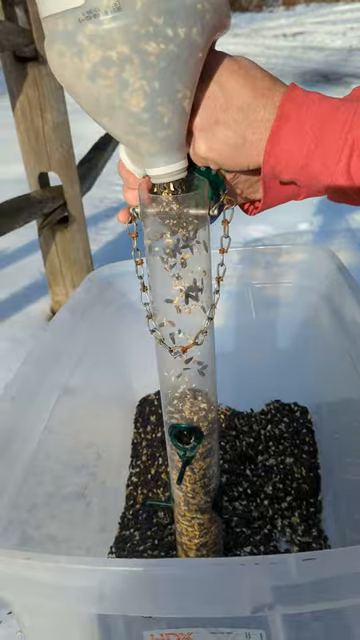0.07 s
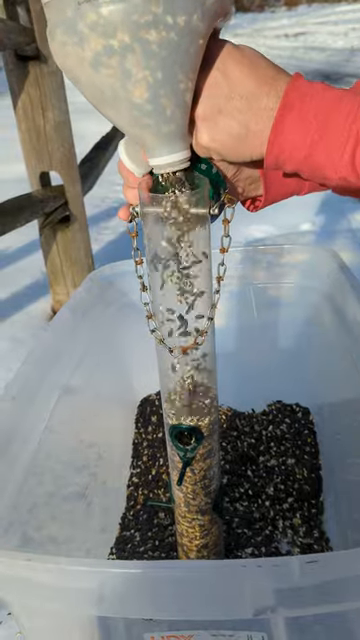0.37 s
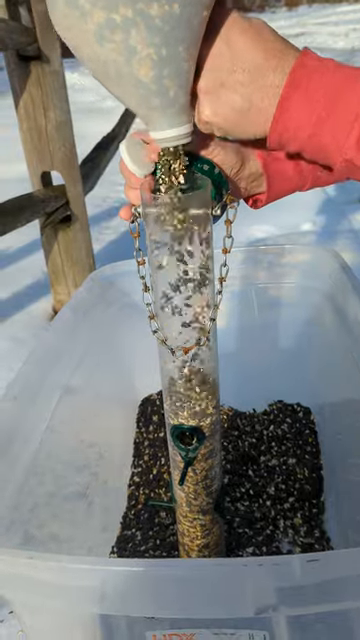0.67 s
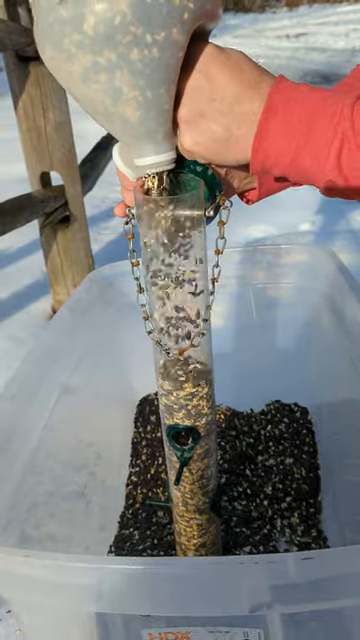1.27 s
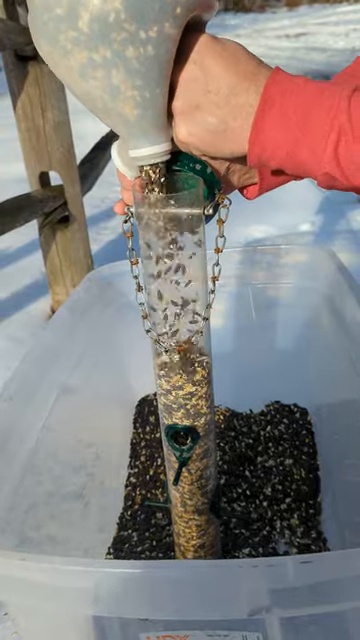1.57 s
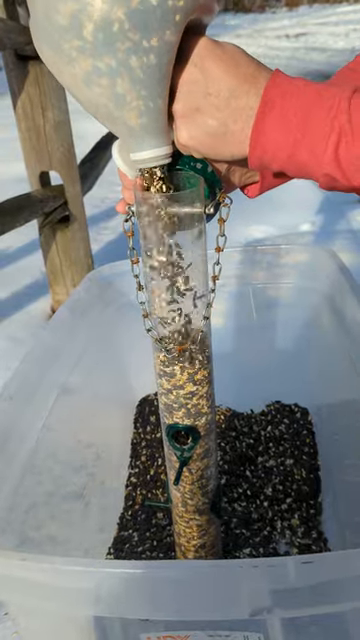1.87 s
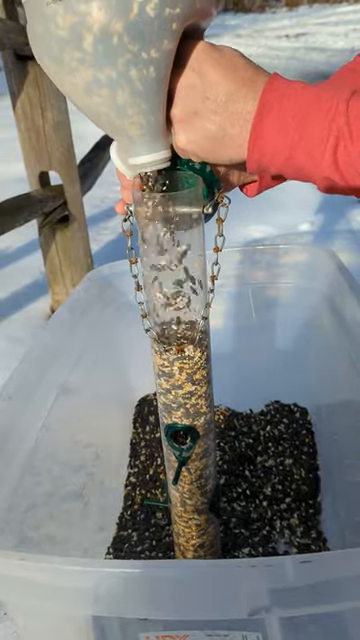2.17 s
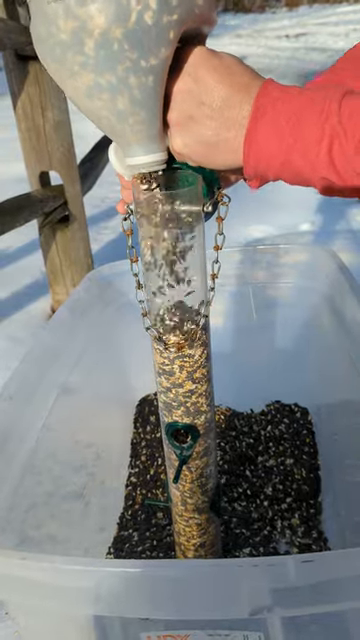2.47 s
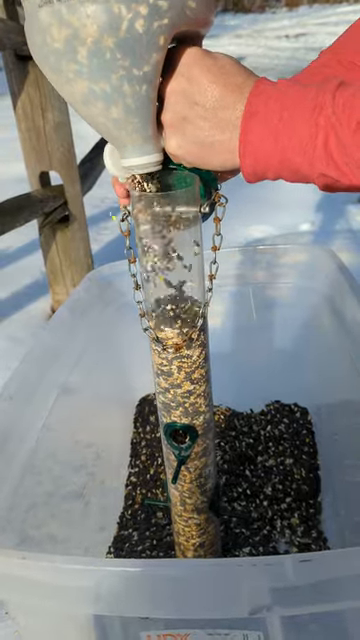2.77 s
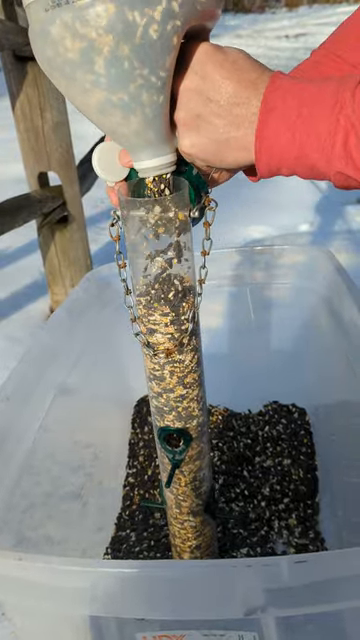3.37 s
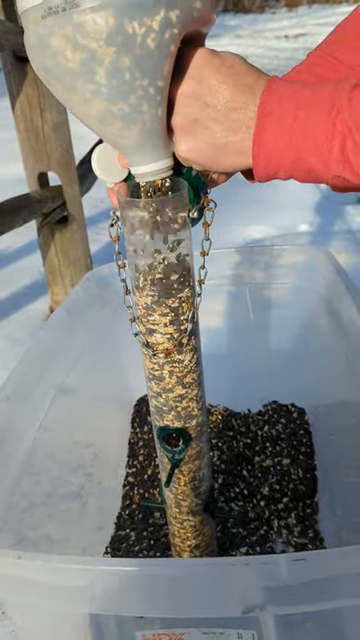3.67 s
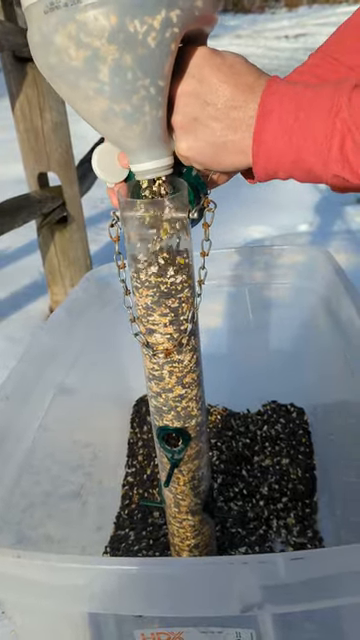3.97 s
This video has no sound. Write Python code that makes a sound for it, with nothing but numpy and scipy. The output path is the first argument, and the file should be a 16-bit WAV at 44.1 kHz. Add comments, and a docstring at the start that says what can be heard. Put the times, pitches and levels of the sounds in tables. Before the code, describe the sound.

Dry seed pours into a plastic tube feeder for the whole 4 seconds, a close, dense, bright patter slightly to the left. Large seeds click and ping on the plastic, hardest in the first 2 seconds. The tube's hollow ring rises slightly and fades from about 1 second on. The jug gives a few very soft knocks, near 0.3 and 2.7 seconds, over a barely audible outdoor rumble.

```python
"""Filling a bird feeder.

Dry seed pours from a plastic jug into a plastic tube feeder outdoors. Thousands of seeds a second
tick on the pile and the tube wall in small clumps; large ones strike hard and ping. The air in the
tube rings, rises in pitch and fades as the tube fills. The jug knocks and hums softly in the hand,
over a faint distant rumble."""
import sys
import numpy as np
from scipy import signal
from scipy.fft import rfft, irfft, next_fast_len
from scipy.io import wavfile
from scipy.ndimage import map_coordinates

SR = 44100
rng = np.random.default_rng(int(sys.argv[2]) if len(sys.argv) > 2 else 0)


def digitize_waveform(pressure):
    """Quantize a signal to 16-bit integers and store it at the path in sys.argv[1].

    Rows of a 2-D input are taken as channels; values are limited to [-1, 1].
    """
    field = np.atleast_2d(pressure).T
    bounded = np.clip(field, -1, 1)
    quanta = np.round(bounded * 32767).astype(np.int16)
    wavfile.write(sys.argv[1], SR, quanta)


N = 176400

# Lowest air mode as the tube fills. Each row: time in seconds, pitch in Hz, relative level in dB,
# relative level of the mode at three times that pitch in dB.
FUNDAMENTAL = [(0, 346.8, -67, -86), (0.8, 364.8, -65, -72), (1.5, 377.6, -65.5, -60.5),
               (2.2, 393.5, -67.5, -59), (2.8, 403.4, -68, -62.5), (4, 417, -67, -69)]


def amp(db):
    """Decibels to gain."""
    return 10 ** (np.asarray(db) / 20)


def unit(x):
    """Scale to rms 1."""
    return x / np.sqrt(np.mean(x ** 2) + 1e-20)


def along(points, hz):
    """Interpolate (Hz, value) rows on a log axis."""
    f, v = np.transpose(points)
    return np.interp(np.log(hz + 1), np.log(f + 1), v)


def curve(rows):
    """One value per sample from (seconds, value) rows."""
    return np.interp(np.arange(N) / SR, *np.transpose(rows))


def wobble(rate_hz):
    """Smooth random curve, rate_hz knots a second."""
    knots = rng.standard_normal(int(N * rate_hz / SR) + 4)
    return map_coordinates(knots, [np.arange(N) * rate_hz / SR])


def filtered(x, response):
    """Multiply the spectrum of x by response(hz)."""
    m = next_fast_len(N + SR // 4)
    return irfft(rfft(x, m) * response(np.fft.rfftfreq(m, 1 / SR)), m)[..., :N]


def low_cut(x, cut_hz):
    """Zero-phase high-pass, 24 dB per octave."""
    return filtered(x, lambda hz: hz ** 4 / (hz ** 4 + cut_hz ** 4))


def body(x, gain, size=4096):
    """Ring x through a minimum-phase filter of magnitude gain(hz)."""
    cepstrum = irfft(np.log(np.maximum(gain(np.fft.rfftfreq(size, 1 / SR)), 1e-6)))
    cepstrum[1:size // 2] *= 2
    cepstrum[size // 2 + 1:] = 0
    impulse = irfft(np.exp(rfft(cepstrum)))
    return signal.fftconvolve(x, impulse[None], axes=1)[:, :N]


def ticks(stream_db, seeds, rate_hz, spread_db, t60_s, rattle_db, rattle_t60_s):
    """Impacts of random size: a tiny crack, then a brief rattle of the nudged seeds."""
    chance, shared_size = seeds
    share = 0.84  # how far a seed sounds equally strong on all it touches
    size = share * shared_size + np.sqrt(1 - share ** 2) * rng.standard_normal(N)
    energy = (chance < rate_hz / SR) * amp(stream_db + spread_db * np.minimum(size, np.e)) ** 2
    t = np.arange(SR // 20) / SR
    crack, rattle = amp(-60 * t / t60_s) ** 2, amp(-60 * t / rattle_t60_s) ** 2
    decay = crack / crack.sum() + amp(rattle_db) ** 2 * rattle / rattle.sum()
    power = signal.fftconvolve(energy, decay)[:N]
    return unit(np.sqrt(abs(power)) * rng.standard_normal((2, N)))


def pings(rate_hz, low_hz, high_hz, spread_db, t60_s, samples):
    """Seeds differ in size, so each rings briefly at its own pitch."""
    draws, step = rng.random((int(rate_hz * N / SR), 5)), np.arange(samples)
    onset, pitch, size, *phases = draws.T[:, :, None]
    size_db = spread_db * np.clip(np.log(size / (1 - size)) / np.sqrt(np.pi), -np.e, np.e)
    hz = low_hz + (high_hz - low_hz) * pitch
    fade = amp(size_db) * amp(-60 * step / SR / t60_s)
    where = ((onset * N).astype(int) + step).ravel()
    rings = [fade * np.sin(2 * np.pi * (hz * step / SR + phase)) for phase in phases]
    return unit(np.array([np.bincount(where, ring.ravel(), N)[:N] for ring in rings]))


def pile(stream_db, seeds):
    """Seeds land on the pile, coloured by the feeder under it."""
    # Each row: time in seconds, relative level in dB.
    flow = [(0.0, -42), (0.01, -42.5), (0.18, -46), (0.19, -55), (0.21, -40), (0.32, -46.5), (0.335, -39.5),
            (0.36, -42.5), (0.39, -42.5), (0.41, -60), (0.43, -40), (0.8, -43), (0.83, -40.5),
            (0.92, -42.5), (1.0, -41), (1.06, -45), (1.11, -39.5), (1.15, -44), (1.98, -42.5),
            (2.02, -44.5), (3.04, -45), (3.09, -42.5), (3.28, -44), (3.38, -46), (3.68, -44), (3.88, -46),
            (4.0, -43.5)]
    # Contact spectrum. Each row: frequency in Hz, relative gain in dB.
    colour = [(40, -54), (130, -38.5), (280, -23.5), (400, -18), (520, -11.5), (680, -10.5), (850, -8.5),
              (1030, -16.5), (1250, -5.5), (1600, -1.5), (2400, 2), (3600, -5), (5000, -11), (8000, -4.5),
              (15000, -13)]
    # Feeder resonances. Each row: centre in Hz, width in Hz, lift in dB.
    resonances = [(640, 260, 1), (870, 270, 0.5), (1769, 98, 6.5), (1800, 87, 0.5), (2430, 290, -1),
                  (2590, 230, -3), (2820, 280, 2.5)]

    def gain(hz):
        lift_db = sum(db / (1 + (2 * (hz - centre) / width) ** 2) for centre, width, db in resonances)
        return amp(along(colour, hz) + lift_db)
    hits = ticks(stream_db, seeds, rate_hz=3200, spread_db=2.5, t60_s=0.00087,
                 rattle_db=2.5, rattle_t60_s=0.057)
    return unit(body(hits, gain)) * amp(curve(flow) + 2)


def husks(stream_db, seeds):
    """Light husks and millet tick, with bright pings of single seeds."""
    # Each row: time in seconds, relative level in dB.
    flow = [(0.0, -35), (0.15, -38.5), (0.46, -40.5), (0.48, -51), (0.5, -37), (0.57, -40.5), (0.6, -34.5),
            (0.61, -39.5), (0.75, -37), (1.2, -42.5), (1.37, -39), (1.49, -41), (1.54, -37), (1.55, -44),
            (1.73, -41), (1.74, -40), (1.79, -44), (1.84, -38.5), (1.85, -40.5), (2.26, -42), (2.28, -38),
            (2.31, -44.5), (2.39, -41), (2.47, -42.5), (3.06, -42), (3.09, -38.5), (3.22, -43), (3.74, -43),
            (3.79, -47), (4.0, -42)]
    # Contact spectrum. Each row: frequency in Hz, relative gain in dB.
    colour = [(1000, -16.5), (4000, -2.5), (7000, -6), (8700, -2), (9500, -3.5), (10300, 0.5), (10900, -3),
              (11600, 1), (12400, 0), (13300, -2.5), (15000, -1.5), (16000, -3.5)]
    hits = ticks(stream_db, seeds, rate_hz=3000, spread_db=3, t60_s=0.00068,
                 rattle_db=1, rattle_t60_s=0.047)
    rings = pings(rate_hz=1600, low_hz=3470, high_hz=16130, spread_db=2.5, t60_s=0.02, samples=680)
    hits += amp(-3) * unit(amp(stream_db) * rings)
    return unit(body(hits, lambda hz: amp(along(colour, hz)))) * amp(curve(flow) + 4.5)


def wall(stream_db, seeds):
    """Seeds glance off the tube wall."""
    # Each row: time in seconds, relative level in dB.
    flow = [(0.0, -48), (0.14, -37.5), (0.19, -53), (0.23, -39), (0.31, -49), (0.33, -44), (0.36, -43),
            (0.43, -42), (0.5, -45.5), (0.83, -38.5), (0.92, -46), (0.97, -36), (1.16, -43), (2.17, -42.5),
            (2.33, -45.5), (3.05, -43), (3.16, -40), (3.3, -40), (3.46, -43), (3.71, -39), (3.73, -44),
            (3.97, -41.5), (4.0, -43)]
    # Contact spectrum. Each row: frequency in Hz, relative gain in dB.
    colour = [(2000, -42), (5400, -16.5), (6100, -6), (6700, -3.5), (7250, -0.5), (7650, -5.5),
              (8000, -13.5), (8800, -6.5), (11000, -53)]
    hits = ticks(stream_db, seeds, rate_hz=2600, spread_db=5.5, t60_s=0.0019,
                 rattle_db=-1.5, rattle_t60_s=0.032)
    return unit(body(hits, lambda hz: amp(along(colour, hz)))) * amp(curve(flow) + 1.5)


def tube_air(stream_db, seeds, hard_hits):
    """Patter and hard strikes ring the tube's air modes, which glide up as the seed rises."""
    # Ring of the patter, choked by the fill. Each row: time in seconds, relative level in dB.
    hollow = [(0, -34), (.1, -36.5), (.18, -41.5), (.24, -38), (.4, -39.5), (.47, -39.5), (.65, -40.5),
              (.87, -39.8), (1.08, -43.5), (1.25, -47), (2.15, -47.5), (2.8, -53), (4, -60)]
    # Each row: starting pitch in Hz, width in Hz, relative gain in dB, share of the fundamental's rise.
    modes = [(844, 94, -7, .6), (1469, 90, 4, 0.66), (1745, 63, -5, 0.1), (2250, 190, -0.5, 0.43),
             (2873, 140, 3, 0.71), (3247, 120, -5.5, 0.48), (4130, 87, 1.5, 0.38), (4326, 180, -0.5, 0.55),
             (6150, 280, 2, 0.33), (7480, 90, -1, .05)]
    patter = ticks(stream_db, seeds, rate_hz=3000, spread_db=3.5, t60_s=0.0013,
                   rattle_db=-2, rattle_t60_s=0.02)
    drive = patter * amp(curve(hollow)) + amp(-8.5) * hard_hits
    pitch_hz = curve(np.array(FUNDAMENTAL)[:, :2])
    out, noise_power = 0, 0
    for hz, width_hz, db, follow in modes:
        carrier = np.exp(2j * np.pi * np.cumsum(hz * (pitch_hz / pitch_hz[0]) ** follow) / SR)
        pole = np.exp(-np.pi * width_hz / SR)
        envelope = signal.lfilter([1 - pole], [1, -pole], drive * carrier.conj())
        out += amp(db) * (carrier * envelope).real
        noise_power += amp(db) ** 2 * (1 - pole) / (1 + pole) / 2
    return low_cut(out / np.sqrt(noise_power), cut_hz=740)  # trims the resonators' low skirts


def low_ring(width_hz=63, flutter_db=1.9):
    """Patter keeps the tube's two lowest odd air modes sounding; their pitch creeps up with the fill."""
    rows = np.array(FUNDAMENTAL)
    cycles = np.cumsum(curve(rows[:, :2])) / SR
    out = 0
    for multiple, column in [(1, 2), (3, 3)]:
        patter = rng.standard_normal((2, N)) + 1j * rng.standard_normal((2, N))
        band = signal.butter(2, multiple * width_hz / 2, fs=SR, output="sos")
        ring = (signal.sosfilt(band, patter) * np.exp(2j * np.pi * multiple * cycles)).real
        flutter = amp(flutter_db * wobble(rate_hz=30))
        out += unit(flutter * ring) * amp(curve(rows[:, [0, column]]))
    return out


def outdoors(level_db=-72.5, side_db=-10):
    """Faint distant rumble, nearly the same on both sides."""
    # Rumble spectrum before the roll-off. Each row: frequency in Hz, relative gain in dB.
    colour = [(20, -20), (38, -12), (58, 1), (85, -1.5), (105, -6), (120, 5), (140, -4), (250, -10.5),
              (1000, -25)]
    noise = rng.standard_normal((2, N))
    mid, side = filtered(noise, lambda hz: amp(along(colour, hz)) / (1 + (hz / 1500) ** 2))
    return amp(level_db) * unit(mid + amp(side_db) * np.array([side, -side]))


def strikes(attack_s=0.00101, spray_octaves=1.5):
    """Large seeds hit the plastic: a short ping with a 1 ms attack, in a spray of smaller contacts."""
    # Each row: start in seconds, relative level in dB, pitch in Hz.
    hits = [(0.0295, -24.5, 6350), (0.098, -24, 4430), (0.2481, -18, 6280), (0.3299, -17.5, 6030),
            (0.338, -21, 6030), (0.438, -14.5, 7460), (0.4471, -18, 6800), (0.4682, -17.5, 7560),
            (0.4893, -21, 2950), (0.597, -22.5, 7050), (0.6075, -16.5, 7480), (0.709, -25, 7240),
            (0.845, -19, 6100), (0.996, -19, 7300), (1.082, -17.5, 6120), (1.149, -23, 6730),
            (1.183, -26, 6280), (1.313, -17, 10360), (1.4192, -21, 7600), (1.512, -21, 11900),
            (1.5281, -15, 11300), (1.6184, -23, 8530), (1.8286, -18, 10600), (1.8294, -23.5, 4320),
            (1.8682, -22, 6800), (1.9665, -22, 7340), (2.174, -21.5, 8990), (2.2295, -30, 7300),
            (2.3509, -25, 2290), (2.6863, -23, 9340), (2.7674, -19, 10100), (2.9298, -26, 7700),
            (3.079, -23, 6500), (3.2785, -23, 7300), (3.3454, -28, 6900), (3.4665, -29, 6960),
            (3.508, -24, 7200), (3.7456, -26, 8800), (3.7733, -25.5, 6580), (3.8912, -22, 6770)]
    out, t = np.zeros((2, N + SR)), np.arange(SR // 20) / SR
    octave = np.log2(np.fft.rfftfreq(len(t), 1 / SR) + 1)

    def envelope(t60_s):
        return np.minimum(t / attack_s, 1) ** np.pi * amp(-60 * np.maximum(t - attack_s, 0) / t60_s)
    ring = amp(1) * envelope(t60_s=0.0093)
    crack = amp(1.5) * envelope(t60_s=0.0007)
    rattle = envelope(t60_s=0.018)
    for start_s, db, hz in hits:
        ping = ring * np.sin(2 * np.pi * (hz * t + rng.random((2, 1))))
        colour = 1 / (1 + ((octave - np.log2(hz)) / spray_octaves) ** 2)
        spray = unit(irfft(rfft(rng.standard_normal((2, len(t)))) * colour, len(t)))
        out[:, round(start_s * SR):][:, :len(t)] += amp(db - 13) * (ping + spray * (crack + rattle))
    return low_cut(out[:, :N], cut_hz=1100)


def jug(rise_cycles=0.89):
    """The jug knocks softly against the feeder and hums as it flexes in the hand."""
    # Each row: start in seconds, level in dB, pitch in Hz, T60 in seconds.
    knocks = [(.305, -55, 150, .09), (.331, -54, 185, .08), (1.345, -62, 85, .14), (1.445, -56, 50, 0.19),
              (2.658, -47, 897, .08), (2.79, -63, 65, .14), (2.975, -58, 159, .11)]
    # Each row: centre in seconds, level in dB, pitch in Hz, half length in seconds.
    flexes = [(1.70, -68, 85, .06), (1.803, -57, 83, 0.071), (1.80, -71.5, 162, 0.061)]
    t, out = np.arange(N) / SR, 0
    for start_s, db, hz, t60_s in knocks:
        age = np.maximum(t - start_s, 0)
        swell = 1 - np.exp(-(age * hz / rise_cycles) ** 2)  # soft contact: lower swells slower
        out += amp(db - 60 * age / t60_s) * swell * np.sin(2 * np.pi * hz * age)
    for centre_s, db, hz, half_s in flexes:
        age = t - centre_s
        out += amp(db) * np.exp(-(age / half_s) ** 2) * np.sin(2 * np.pi * hz * age)
    return out


def placed(pair):
    """Mix two unrelated versions of a sound into left and right at the feeder's position."""
    # Each row: frequency in Hz, left-right coherence from 0 to 1.
    coherence = [(200, 0.97), (900, 0.95), (1700, 0.95), (2600, 0.42), (4300, 0.89), (6500, 0.78),
                 (7800, 0.06), (10000, 0.38), (12200, 0.26), (15000, 0.17)]
    # Each row: frequency in Hz, left over right in dB.
    balance = [(100, .5), (400, 2.3), (800, 1.6), (1600, 3.4), (3000, 5.6), (4400, 7.7), (6000, 5.9),
               (7400, 10.6), (9000, 6.3), (10500, 2.5), (12000, 0.97), (15000, 0.57)]
    # Each row: frequency in Hz, phase lead of the left in radians.
    lead = [(100, 0.5), (450, 1.21), (1000, 1.44), (1750, 2), (2400, 2), (2800, -2), (4000, -1.37),
            (5400, -1.36), (6200, 1.75), (7400, 2), (8600, 0.9), (10300, -1), (11500, 1.15), (12500, 1.5),
            (14500, 4.5)]

    def mix(hz):
        angle = np.arccos(np.clip(along(coherence, hz), 0, 1)) / 2
        return np.array([np.cos(angle), np.sin(angle)])

    def pan(hz):
        left = amp(along(balance, hz) / 2) * np.exp(.5j * along(lead, hz))
        return np.array([left, 1 / left]) / np.hypot(abs(left), 1 / abs(left))
    shared, apart = filtered(pair, mix)
    return filtered(np.array([shared + apart, shared - apart]), pan)


def scene():
    """One clumpy stream sounds pile, husks, wall and tube air; the jug and the rumble join it."""
    hard_hits = strikes()
    stream_db = 0.87 * wobble(rate_hz=190) + 0.6 * wobble(rate_hz=25)  # clumps and slower surges
    seeds = rng.random(N), rng.standard_normal(N)  # arrival chance, size
    contacts = pile(stream_db, seeds) + husks(stream_db, seeds) + wall(stream_db, seeds) + hard_hits
    air = tube_air(stream_db, seeds, hard_hits) + low_ring()
    feeder = low_cut(contacts + air, cut_hz=212)  # the narrow tube radiates little bass
    return np.sqrt(2) * placed(feeder) + jug() + outdoors()


def record(dry):
    """Brick-wall band limit."""
    return filtered(dry, lambda hz: hz < 15850)


dry = scene()
out = record(dry)
digitize_waveform(out)
```